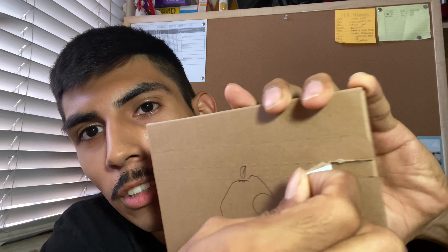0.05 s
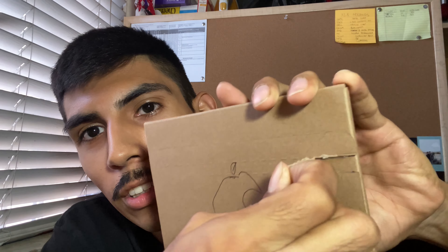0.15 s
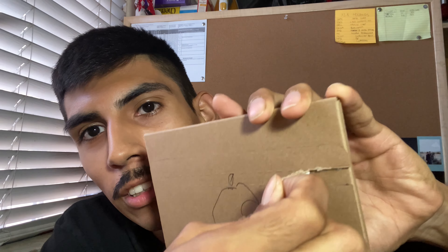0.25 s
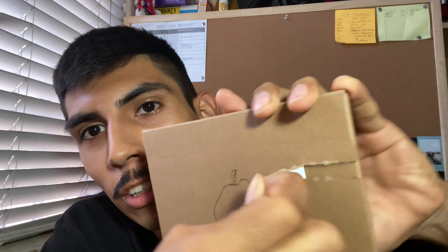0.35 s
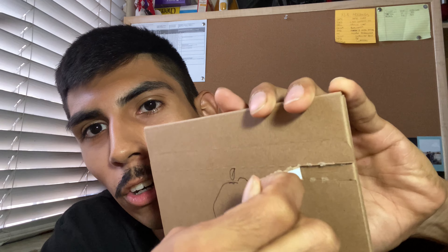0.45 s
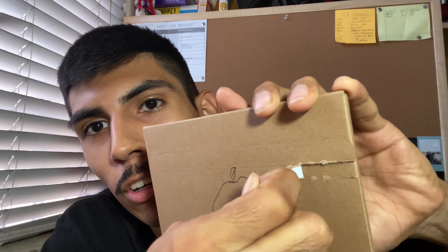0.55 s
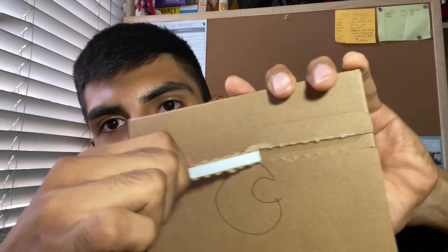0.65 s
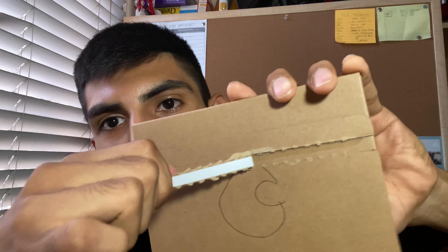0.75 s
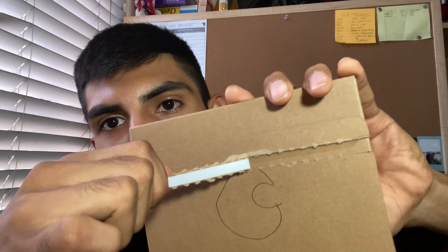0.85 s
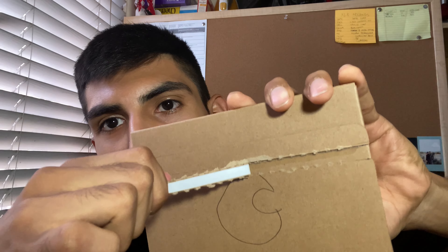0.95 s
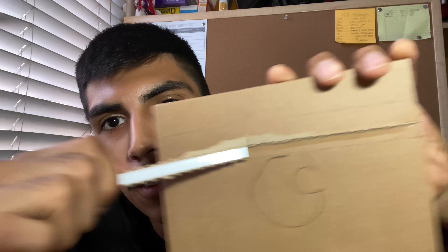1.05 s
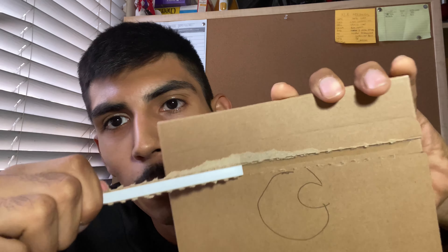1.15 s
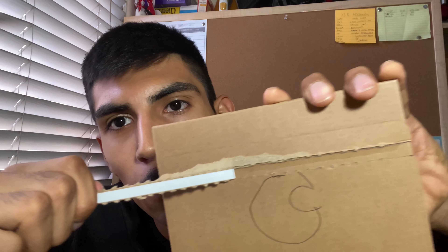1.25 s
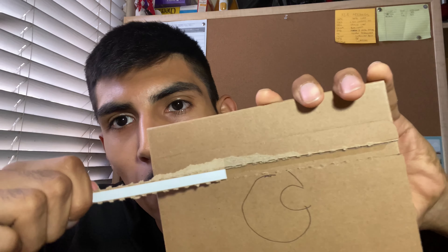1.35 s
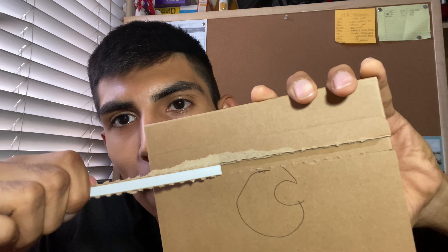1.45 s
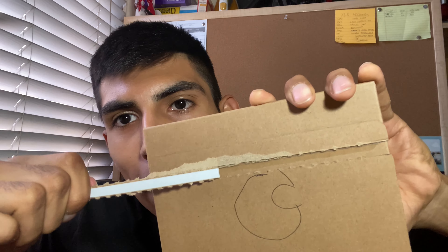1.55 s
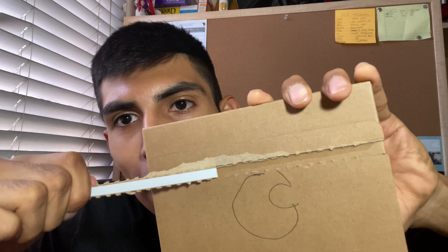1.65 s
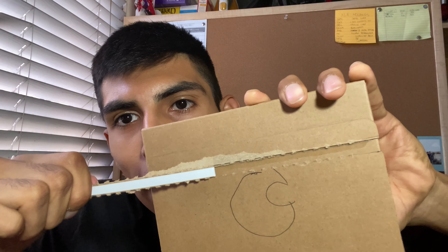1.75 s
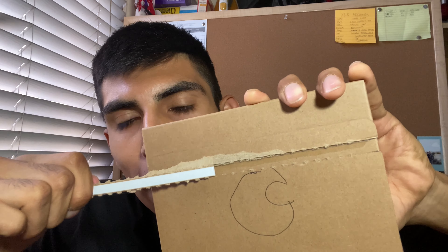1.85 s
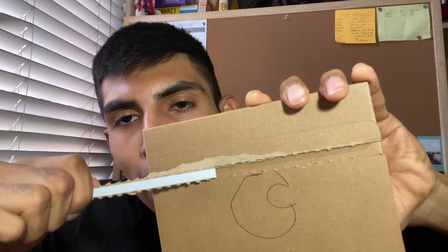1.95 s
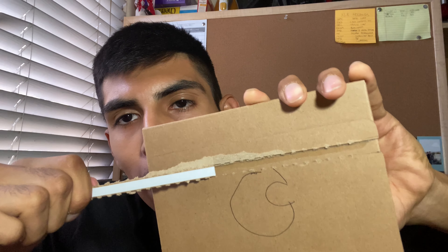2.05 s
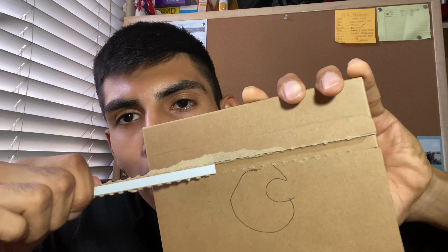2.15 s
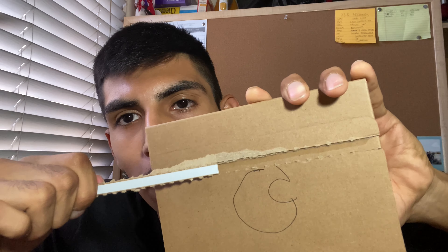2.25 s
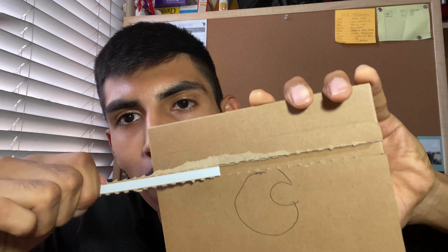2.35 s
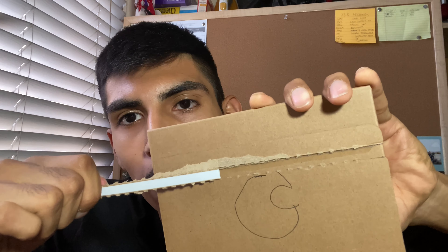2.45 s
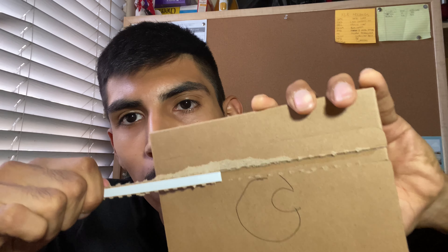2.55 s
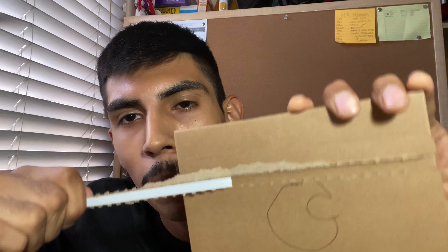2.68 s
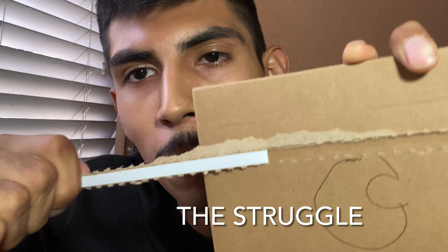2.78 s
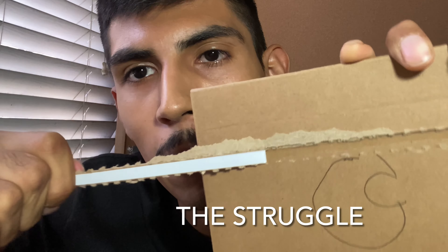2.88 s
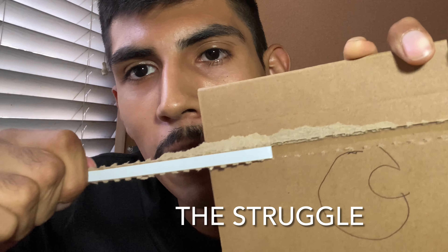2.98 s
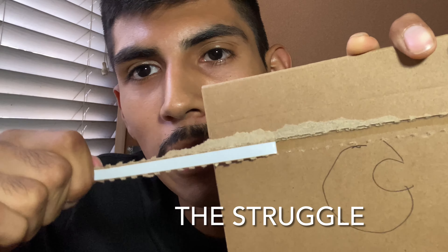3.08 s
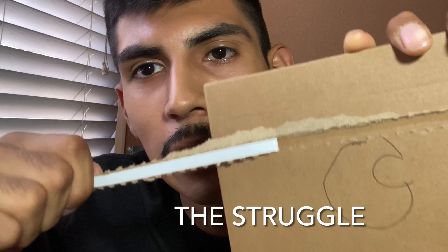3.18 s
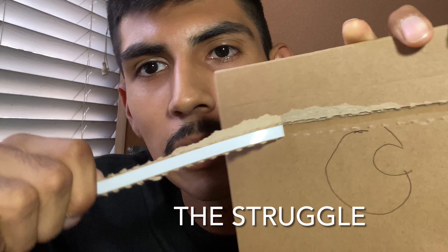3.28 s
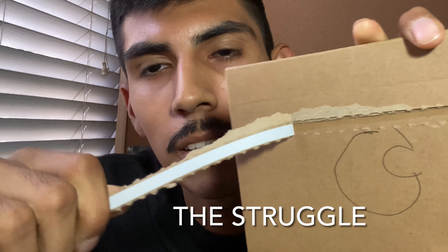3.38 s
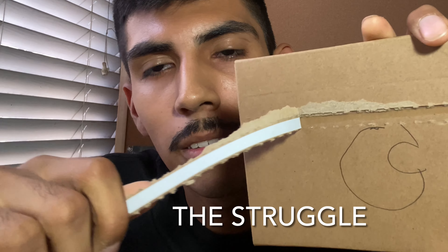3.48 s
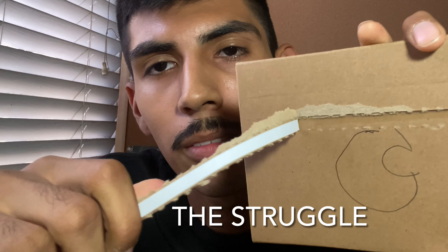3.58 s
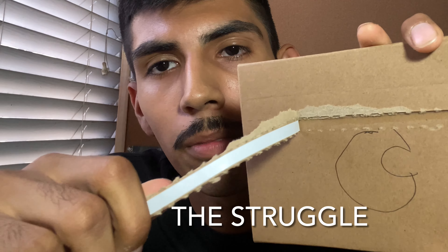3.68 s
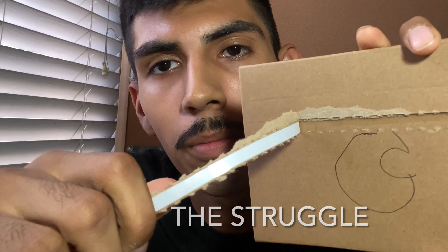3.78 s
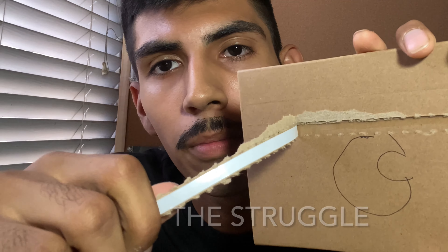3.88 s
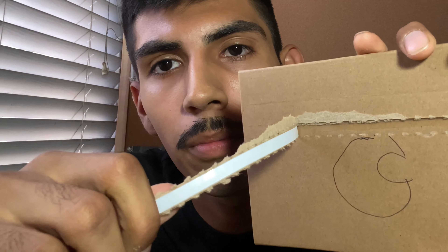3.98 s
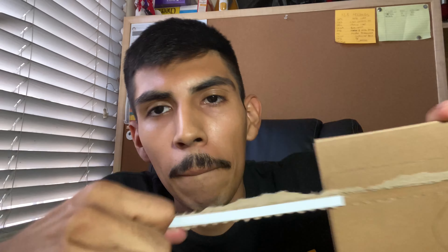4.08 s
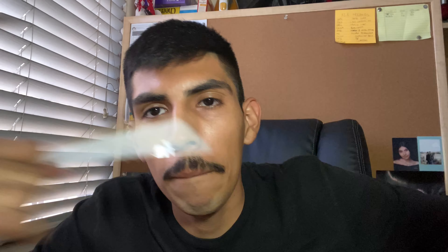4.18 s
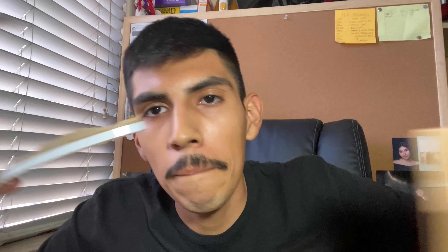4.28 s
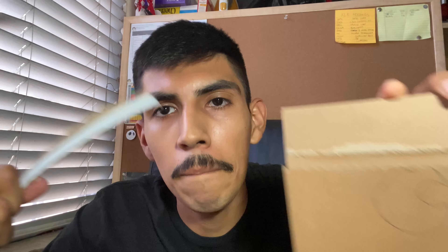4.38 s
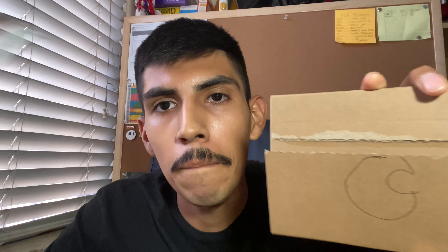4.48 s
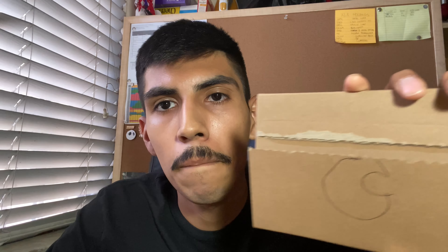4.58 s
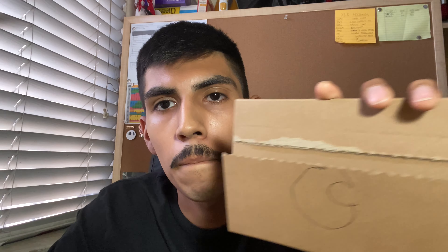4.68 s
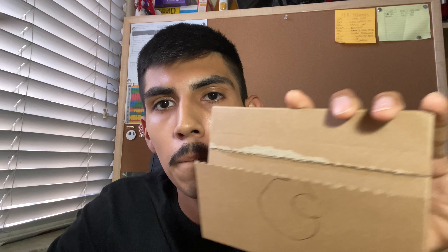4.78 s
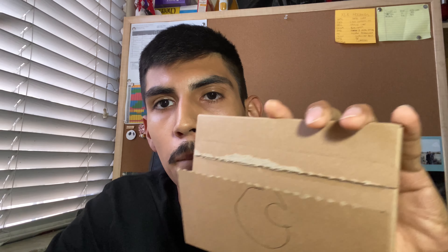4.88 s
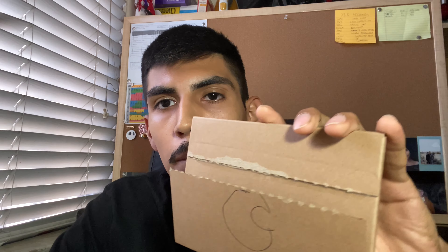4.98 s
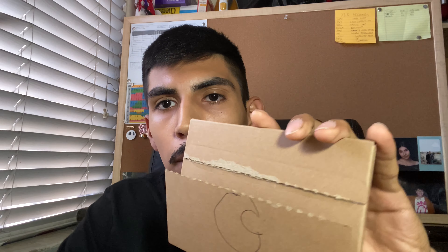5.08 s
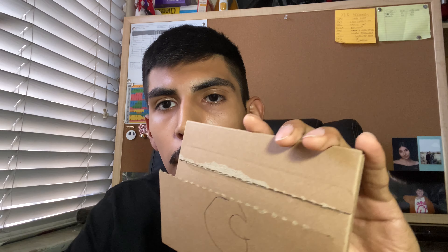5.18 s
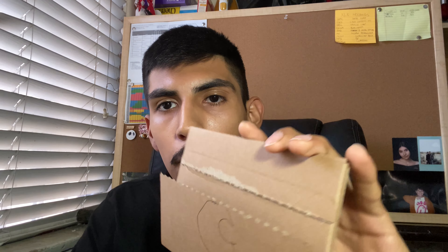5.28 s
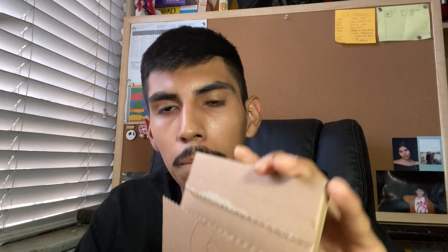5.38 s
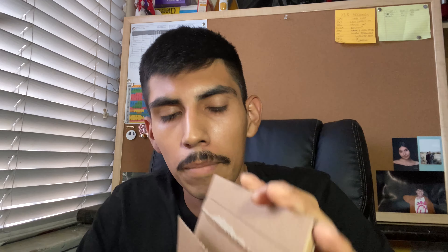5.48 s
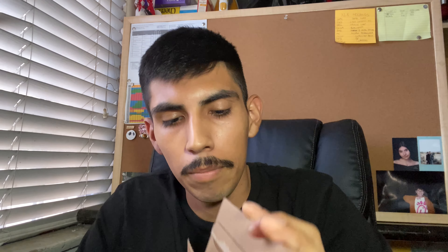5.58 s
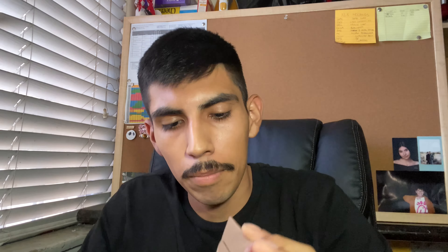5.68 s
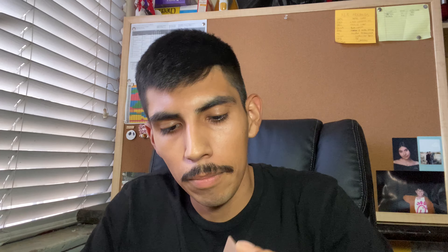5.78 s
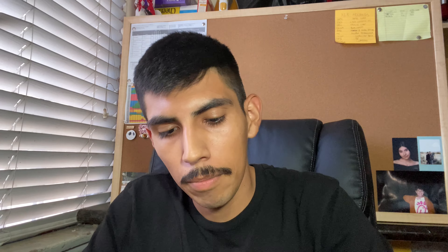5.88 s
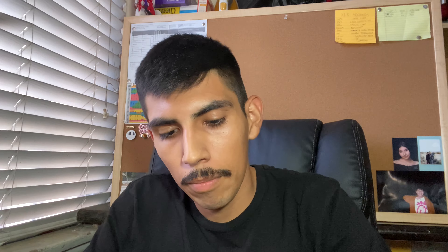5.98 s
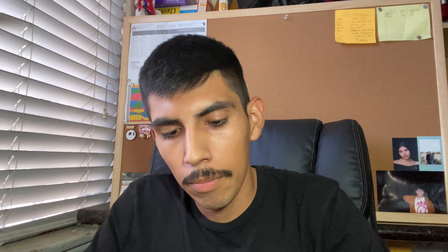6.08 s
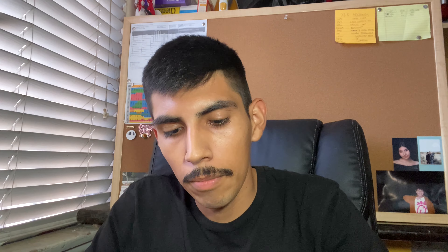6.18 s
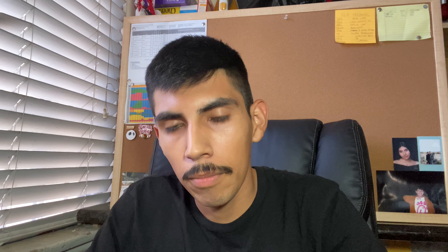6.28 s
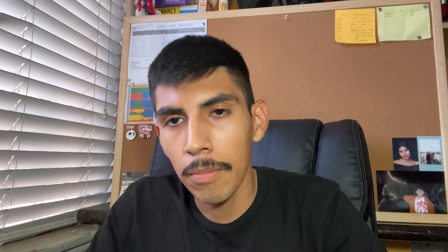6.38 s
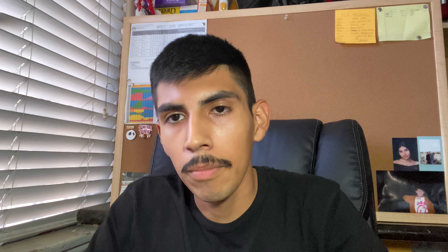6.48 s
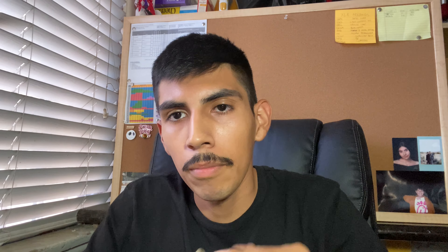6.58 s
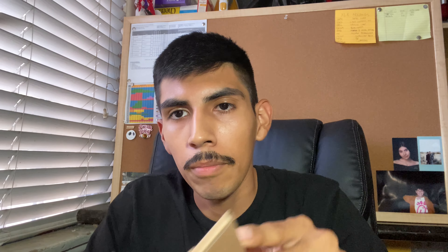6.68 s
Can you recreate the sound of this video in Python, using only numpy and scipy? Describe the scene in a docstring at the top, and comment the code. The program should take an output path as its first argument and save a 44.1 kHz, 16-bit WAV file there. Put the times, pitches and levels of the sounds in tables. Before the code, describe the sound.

Very close to a stereo microphone in a small furnished room, a cardboard strip tears in short jerks: crisp fibre crackle, sharp snaps and hollow board thumps, strongest around one second. Fine ticks trail off into quiet, then a violent snap at about 2.6 seconds, another rip just after four, and finally light taps and rubs of the flap. A low, faint fan hum lies beneath.

```python
"""A tear strip is pulled out of a cardboard mailer in jerks, close to a two-port microphone in a small furnished room.
Parting fibres are clumped random clicks, snapping bridges are short noise bursts, and both ring the board's modes.
The mailer flexes as a damped swing of sinking pitch; squeaks and finger scuffs are roughened gliding tones, and
hard hits send swooping bending waves across the board. Later, hands tap and rub the flap. Decaying noise makes
the echoes of the small room, where resonated noise makes a fan hum over shaped rumble and hiss."""
import sys
import numpy as np
from scipy import signal
from scipy.fft import rfft, irfft, next_fast_len
from scipy.io import wavfile
from scipy.ndimage import uniform_filter1d

SR = 44100
rng = np.random.default_rng(int(sys.argv[2]) if len(sys.argv) > 2 else 0)


def transcribe(signal):
    """Save signal, clipped to [-1, 1], as a 16-bit WAV file at the path in sys.argv[1]."""
    frames = np.atleast_2d(signal).T
    limited = np.clip(frames, -1, 1)
    pcm = np.round(limited * 32767).astype(np.int16)
    wavfile.write(sys.argv[1], SR, pcm)


def amplitude_ratio(level_db):
    """Convert a level in decibels to the matching linear amplitude (field) ratio."""
    exponent = np.asarray(level_db, float) / 20
    return 10 ** exponent


N = 297234   # samples
HZ = np.fft.rfftfreq(N, 1 / SR) + 1e-3   # the offset keeps log(HZ) finite


def rms_one(x):
    """Normalisation: scale to unit rms."""
    return x / np.sqrt(np.mean(x ** 2) + 1e-20)


def at_hz(points, column=1):
    """Spectral envelope: a table interpolated over log frequency onto the FFT grid."""
    points = np.array(points)
    return np.interp(np.log(HZ), np.log(points[:, 0]), points[:, column])


def colour(x, response):
    """Linear filtering: the spectrum is multiplied by a frequency response."""
    return irfft(rfft(x) * response, N)


def resonate(x, hz, width_hz):
    """Damped resonance: a two-pole filter with gain 1 on top."""
    r = np.exp(-np.pi * width_hz / SR)
    zeros = [(1 - r * r) / 2, 0, (r * r - 1) / 2]
    poles = [1, -2 * r * np.cos(2 * np.pi * hz / SR), r * r]
    return signal.lfilter(zeros, poles, x + 1e-18)


def drift(rate_hz):
    """Slow random fluctuation: low-passed noise of unit rms."""
    r = np.exp(-2 * np.pi * rate_hz / SR)
    return rms_one(signal.lfilter([1], [1, -2 * r, r * r], rng.standard_normal(N)))


def grains(per_s, spread_db, clump_db, clump_hz):
    """Stick-slip impulse noise: random clicks of uneven size that come in clumps; rms 1."""
    sizes = amplitude_ratio(spread_db * np.minimum(rng.exponential(1, N), 4)) * rng.choice([-1, 1], N)
    struck = rng.random(N) < per_s / SR
    return rms_one(sizes * struck * amplitude_ratio(clump_db * drift(clump_hz)))


def rip_ring_hz(s):
    """Modal shift: the board's brightest ring rises as the tear nears the edge."""
    start_hz, rise_octaves_per_s = 1250., 0.17
    return start_hz * 2 ** (rise_octaves_per_s * s)


# full rips of the strip: start_s, end_s, crackle_db, board_db, change_db (over the rip)
RIP_TABLE = [(0, 0.006, -30.5, -25.5, -12), (0.339, 0.377, -31, -33, 7.5),
             (0.624, .692, -36.5, -37.5, -8.5), (0.672, 0.719, -30.5, -33, 3.5),
             (1.006, 1.049, -23.5, -23, 9), (1.063, 1.1, -23.5, -22, -5.5),
             (2.621, 2.643, -21.5, -24.5, 7.5), (4.053, 4.089, -46, -36, -2.5),
             (4.125, 4.155, -31.5, -29.5, -6.5)]
# the strip strains or peels under a light pull: start_s, end_s, crackle_db, change_db
STRAIN_TABLE = [(0.216, 0.341, -68, 28.5), (0.514, 0.593, -61.5, 13.5), (0.945, 1.008, -51, 9),
                (1.149, 1.231, -56, -6.5), (1.24, 1.343, -53.5, -5), (1.324, 1.615, -79, -9.5),
                (2.578, 2.631, -56, 11.5), (4.092, 4.131, -45, 6), (2.987, 3.078, -77.5, -8.5),
                (4.834, 4.876, -76, 4.5)]
# hands and strip rub the board: start_s, end_s, board_db, change_db, bright_hz (brightest ring)
RUB_TABLE = [(0.017, 0.061, -55, 5.5, 1560), (0.771, 0.812, -50.5, -6.5, 1000), (0.825, .87, -54, 2, 1100),
             (.87, .945, -55, 0.5, 1300), (2.693, 2.763, -50.5, -25, 1925), (3.246, 3.337, -73, -3.5, 1760),
             (3.48, 3.54, -65, -10, 3000), (4.166, 4.307, -53.5, -11.5, 2200),
             (4.288, 4.358, -56.5, -13, 1500), (4.955, 4.98, -41, -14.5, 781),
             (4.982, 5.04, -62, -14.5, 2280), (5.27, 5.307, -42, -14, 884), (5.287, 5.345, -57, -7.5, 3770),
             (5.355, 5.452, -61, -13.5, 1190), (5.886, 5.996, -69, 8, 1565),
             (6.489, 6.559, -51, 15.5, 1710), (6.563, 6.64, -58, -22, 1924)]


def stretches(release_s=0.014):
    """Stick-slip friction: each rip, strain or rub starts at once, drifts in level and stops as the motion sticks."""
    strain_board_db, strain_ring_hz = -4.5, 2140   # board relative to the crackle
    rub_crackle_db = -12.5   # crackle relative to the board
    crackle, shake, bright_hz = np.zeros(N), np.zeros(N), np.full(N, 1500.)
    t = np.arange(N) / SR
    rows = [(*rip, rip_ring_hz(rip[0])) for rip in RIP_TABLE]
    rows += [(start, end, db, db + strain_board_db, change, strain_ring_hz)
             for start, end, db, change in STRAIN_TABLE]
    rows += [(start, end, db + rub_crackle_db, db, change, hz) for start, end, db, change, hz in RUB_TABLE]
    for start, end, crackle_db, board_db, change_db, hz in sorted(rows):
        near = slice(max(round(start * SR), 0), round((end + .05) * SR))
        age = t[near] - start
        shape = amplitude_ratio(change_db * (np.minimum(age / (end - start), 1) - .5))
        shape *= np.clip(age / .002, 0, 1) * np.exp(-np.maximum(t[near] - end, 0) / release_s)
        crackle[near] += amplitude_ratio(crackle_db) * shape
        shake[near] += amplitude_ratio(board_db) * shape
        bright_hz[near] = hz
    return crackle, shake, bright_hz


# bridges of the perforation snap: start_s, level_db
SNAP_TABLE = [(0.249, -44.5), (0.294, -48.5), (0.3043, -31.5), (0.313, -41), (0.327, -30), (0.3502, -20.5),
              (0.3536, -18.5), (0.381, -24), (0.525, -47), (0.543, -61), (0.555, -44), (0.627, -18.5),
              (.677, -15.5), (0.712, -22.5), (0.869, -43.5), (0.946, -31), (1.025, -27), (1.042, -11),
              (1.097, -18), (1.19, -35), (1.1993, -33), (1.209, -31), (1.2425, -35), (1.3297, -40.5),
              (1.399, -40.5), (1.4478, -52.5), (1.481, -51), (1.507, -49.5), (1.561, -55), (1.5915, -57),
              (2.541, -50), (2.5866, -36), (2.5967, -49), (2.6181, -19), (2.6293, -12), (2.6478, -4.5),
              (4.554, -51.5), (5.737, -63.5), (5.889, -48)]
# hits from fingers or the whipping strip that mostly ring the board: start_s, ring_db, edge_db, bright_hz
TAP_TABLE = [(0.3645, -16.5, -18, 894), (0.4572, -37, -46.5, 930), (.657, -21, -40, 1109),
             (.717, -20, -38.5, 1186), (.7776, -25.5, -60, 1200), (.8022, -35, -65, 893),
             (1.0082, -10.5, -17.5, 1206), (1.0375, -12.5, -18, 1283), (1.0547, -3, -17, 1250),
             (1.0714, -7.5, -12.5, 1305), (2.7192, -32.5, -49.5, 1770), (3.2693, -56.5, -56, 3500),
             (3.302, -47.5, -55.5, 1500), (3.485, -34, -34, 3900), (4.076, -30.5, -50.5, 1600),
             (4.13, -11.5, -29.5, 1350), (4.1453, -5, -8.5, 2600), (4.2851, -26.5, -45, 1850),
             (4.9507, -26.5, -61, 905), (5.1247, -51, -54, 2960), (5.265, -20, -37.5, 3880),
             (5.3512, -28.5, -73, 1284), (6.4889, -39.5, -58, 1725)]


def hits():
    """Impulsive excitation: snaps and taps as columns start_s, edge_db, ring_db, bright_hz."""
    ring_growth = 1.5   # the board's ring falls faster than the snap weakens
    snaps = [(s, db, ring_growth * db, rip_ring_hz(s)) for s, db in SNAP_TABLE]
    taps = [(s, edge_db, ring_db, hz) for s, ring_db, edge_db, hz in TAP_TABLE]
    return np.transpose(snaps + taps)


def bursts(level_db, fade_s):
    """Impact transient: a short decaying noise burst at every snap and tap."""
    age = np.arange(600)   # samples
    shape = rng.standard_normal((len(level_db), 600)) * np.exp(-age / (fade_s * SR))
    shape[:, 0] = 4.0   # the first contact is the hardest
    # each burst gets the energy of a plain decay from 1
    shape *= np.sqrt(fade_s * SR / 2) / np.linalg.norm(shape, axis=1, keepdims=True)
    out = np.zeros(N + 600)
    for s, gain, row in zip(hits()[0], amplitude_ratio(level_db), shape):
        out[round(s * SR) + age] += gain * row
    return out[:N]


# colour of parting fibres: pitch_hz, relative_db (density per Hz)
FIBRE_COLOUR = [(2000, -19), (4000, -13), (6500, -11), (8500, -3.5), (10400, -0.5), (13000, -9.5),
                (14000, -15.5), (14500, -32), (16500, -48)]


def fibres(crackle, shake, full_tear_db=-48):
    """Fracture noise: lone ticks under a light pull, dense spray at full tear, sharp cracks where a bridge snaps."""
    tone = amplitude_ratio(at_hz(FIBRE_COLOUR))
    tone /= np.sqrt(np.mean(tone ** 2))
    light = 1 / (1 + (crackle / amplitude_ratio(full_tear_db)) ** 2)
    ticking = light * crackle ** 2 / (crackle ** 2 + shake ** 2 + 1e-18)   # mere rubbing stays smooth
    dense = grains(6000, spread_db=3.5, clump_db=3.5, clump_hz=80)
    sparse = grains(150, spread_db=4.0, clump_db=2.0, clump_hz=20) * .7 + dense * .5
    parting = np.sqrt(1 - ticking) * dense + np.sqrt(ticking) * sparse
    cracks = bursts(hits()[1], fade_s=0.00054)
    return colour(crackle * parting + cracks, tone)


# modes of the board: pitch_hz, width_hz, level_db (relative)
BOARD_MODES = [(400, 170, 7.5), (550, 250, 0.5), (685, 200, -4), (851, 78, -1.5), (1000, 110, -4),
               (1200, 120, -1), (1500, 300, 1.5), (2020, 560, 4), (2550, 450, 6.5), (3285, 260, 3.5),
               (4070, 620, 1), (4680, 370, -1.5), (5770, 1800, 0)]


def board(shake, bright_hz, reach=.6):
    """Modal excitation: tearing rings the modes, most those near the brightest, and rumbles below them."""
    _, _, ring_db, ring_hz = hits()
    rub, knock, power = 0, 0, 1e-9
    hard = shake ** 2 / (shake ** 2 + amplitude_ratio(-36) ** 2)   # a hard rip is coarse and shakes every mode, a rub is smooth
    coarse = grains(1200, spread_db=3.2, clump_db=3.0, clump_hz=70)
    smooth = rng.standard_normal(N) * amplitude_ratio(2 * drift(30))
    jolts = np.sqrt(hard) * coarse + np.sqrt(1 - hard) * smooth
    for k, (hz, width_hz, level_db) in enumerate(BOARD_MODES):
        sign = (-1) ** k
        nearness = np.exp(-(np.log(hz / bright_hz) / reach) ** 2)
        weight = amplitude_ratio(level_db) * (.12 + .3 * hard + nearness)
        rub = rub + sign * weight * rms_one(resonate(jolts, hz, width_hz))
        power = power + weight ** 2
        near_db = -15 * np.minimum(np.log(hz / ring_hz) ** 2, 1.4)
        blow = bursts(ring_db + near_db, fade_s=0.0018)
        ring = resonate(resonate(blow, hz, width_hz), hz, 3 * width_hz)
        knock = knock + sign * ring * np.sqrt(900 / width_hz)
    low = 2 * resonate(jolts, 160, 90) + resonate(jolts, 520, 280)
    rumble = amplitude_ratio(-10) * hard * rms_one(low)
    return shake * (rub / np.sqrt(power) + rumble) + knock


# jerks that set the whole mailer swinging: start_s, level_db
FLEX_TABLE = [(0, -21.5), (0.369, -22), (0.631, -26.5), (.687, -28.5), (1.012, -27.5), (1.031, -24.5),
              (1.053, -18.5), (1.085, -19.5), (2.633, -25.5), (2.65, -20.5), (4.066, -26.5), (4.143, -29.5)]


def flexing():
    """Damped oscillation: a jerked mailer swings fast at first, then sinks to its rest pitch and dies."""
    first_hz, rest_hz, sink_s = 92., 63.5, 0.0083
    free_t60_s, free_s, grip_t60_s = 0.14, 0.079, .06   # after free_s the gripping hand adds its damping
    out, age = np.zeros(N + SR), np.arange(SR // 4) / SR
    turns = rest_hz * age + (first_hz - rest_hz) * sink_s * (1 - np.exp(-age / sink_s))
    loss_db = 60 * age / free_t60_s + 60 * np.maximum(age - free_s, 0) / grip_t60_s
    swing = np.minimum(age / 0.0039, 1) * np.sin(2 * np.pi * turns)
    for s, level_db in FLEX_TABLE:
        out[round(s * SR):round(s * SR) + len(age)] += amplitude_ratio(level_db - loss_db) * swing
    return out[:N]


# likeness of diffuse sound at the ports: pitch_hz, common_share (of power, no unit)
COMMON_SHARE = [(60, .9), (200, .6), (700, .1), (6000, .1), (7900, .9), (9300, .5), (10300, .99),
                (11700, .5), (13000, .7)]


def shared(common, own):
    """Partial coherence of a diffuse field: a part common to both ports and a part of each."""
    alike = at_hz(COMMON_SHARE)
    return colour(common, np.sqrt(alike)) + colour(own, np.sqrt(1 - alike))


# echo bands: pitch_hz, t60_s, late_db (echo), scatter_db (off hands and desk), levels before band filtering
ECHO_BANDS = [(60, .2, -18, -14), (500, .26, -11, 0), (1800, .21, -10, 1), (4500, .24, -10, 4),
              (11000, .17, -13, -1)]


def room(x):
    """Reverberant decay: scatter and late echoes are noise dying band by band, one pattern for each mailer pose."""
    poses, pose_s, scatter_t60_s = 3, .06, .015   # the mailer keeps moving, so its echoes change
    t, tail = np.arange(SR // 3) / SR, 0
    white = rng.standard_normal((poses, 3, SR // 3))   # a common pattern and one for each port
    edges = [30] + [np.sqrt(a[0] * b[0]) for a, b in zip(ECHO_BANDS, ECHO_BANDS[1:])] + [17000]
    early = amplitude_ratio(-60 * t / scatter_t60_s)
    for (_, t60, late_db, early_db), low, high in zip(ECHO_BANDS, edges, edges[1:]):
        late = amplitude_ratio(-60 * t / t60) * np.minimum(t / .004, 1)
        fade = amplitude_ratio(late_db) * late / np.linalg.norm(late) + amplitude_ratio(early_db) * early / np.linalg.norm(early)
        band = signal.butter(2, [low, high], "band", fs=SR, output="sos")
        tail = tail + fade * signal.sosfilt(band, white)
    pose = (np.arange(N) / (pose_s * SR)).astype(int) % poses
    held = [uniform_filter1d(1. * (pose == k), size=441) * x for k in range(poses)]
    size = next_fast_len(N + SR // 3)
    spectrum = (rfft(held, size)[:, None] * rfft(tail, size)).sum(axis=0)
    echoes = irfft(spectrum, size)[:, :N]
    return shared(echoes[0], echoes[1:])


# colour of room rumble and hiss: pitch_hz, relative_db (density per Hz)
AIR_COLOUR = [(20, -42.5), (35, -12.5), (55, -1.5), (113, -15.5), (220, -19.5), (380, -32.5), (700, -35.5),
              (1270, -38.5), (2400, -41.5), (5000, -46), (8300, -44.5), (13000, -47), (14300, -54),
              (15500, -82.5)]


def rumble_and_hiss():
    """Broadband background noise: white noise shaped by a spectral envelope."""
    return amplitude_ratio(-64.5) * rms_one(colour(rng.standard_normal(N), amplitude_ratio(at_hz(AIR_COLOUR))))


# hum lines of the fan: pitch_hz, width_hz, level_db
FAN_LINES = [(50.6, 31.1, -56), (108.3, 6.3, -61), (125, 2.8, -75.5), (157, 1.7, -69), (212.84, 4.1, -69.5),
             (287, 45, -76), (2380, 10, -95.5)]


def fan():
    """Narrow-band noise: each line of the hum is noise through two resonances in series."""
    out = 0
    for hz, width_hz, level_db in FAN_LINES:
        line = resonate(resonate(rng.standard_normal(N), hz, width_hz), hz, 3 * width_hz)
        out = out + amplitude_ratio(level_db) * rms_one(line)
    return out


def air():
    """Superposition of a diffuse background: rumble, hiss and fan, partly common to the ports."""
    common, left, right = [rumble_and_hiss() + fan() for _ in range(3)]
    return shared(common, np.array([left, right]))


def glides(rows):
    """Narrow-band modulation: gliding tones, roughened over their width, that swell and fade."""
    swell_skew = 0.91   # under 1 the swell peaks early
    out = np.zeros(N)
    for start, end, first_hz, last_hz, width_hz, level_db in rows:
        part = np.linspace(0, 1, round((end - start) * SR))
        r = np.exp(-np.pi * width_hz / SR)
        noise = [1, 1j] @ rng.standard_normal((2, 9000))
        wobble = signal.lfilter([1], [1, -2 * r, r * r], noise)[-len(part):]
        wobble /= np.abs(wobble) ** 0.62   # the level wavers less than the pitch
        turns = np.cumsum(first_hz + (last_hz - first_hz) * part) / SR
        tone = (wobble * np.exp(2j * np.pi * turns)).real
        swell = np.sin(np.pi * part ** swell_skew) ** 2
        out[round(start * SR):round(start * SR) + len(part)] += amplitude_ratio(level_db) * rms_one(tone) * swell
    return out


# thin squeaks and hums of tape and taut strip: start_s, end_s, first_hz, last_hz, level_db (before the swell)
SQUEAK_TABLE = [(0.104, 0.24, 1366, 1530, -62), (0.454, 0.492, 980, 1000, -35.5),
                (0.483, 0.551, 1000, 926, -55), (.86, 0.972, 144, 128, -44.5),
                (3.355, 3.408, 4730, 4680, -76.5), (3.395, 3.478, 4670, 4270, -65),
                (3.539, 3.608, 900, 835, -71)]


def squeaks():
    """Friction-driven vibration: tape and taut strip sound narrow gliding tones."""
    width = 0.063   # share of the pitch, which counts up to 1200 Hz
    return glides([(start, end, hz, last_hz, width * min(hz, 1200), db)
                   for start, end, hz, last_hz, db in SQUEAK_TABLE])


# hard hits that send a bending wave across the board: start_s, level_db
BEND_TABLE = [(0.3632, -26.5), (0.482, -39), (.626, -32.5), (0.7802, -43.5), (1.0077, -18), (1.0233, -18),
              (1.038, -14), (1.0543, -12), (1.071, -16.5), (2.62, -28), (4.13, -41), (4.952, -29.5),
              (5.385, -46.5)]


def bending():
    """Dispersion: the low part of a bending wave arrives last, so it swoops down in pitch."""
    top_hz, fall_s, fade_s = 1693, .0035, .0045
    out, age = np.zeros(N + SR), np.arange(SR // 20) / SR
    turns = top_hz * fall_s * age / (age + fall_s)
    swoop = np.sin(2 * np.pi * turns) * np.exp(-age / fade_s)
    for s, level_db in BEND_TABLE:
        out[round(s * SR):round(s * SR) + len(age)] += amplitude_ratio(level_db) * swoop
    return out[:N]


# breathy scuffs of fingers on the board: start_s, end_s, first_hz, level_db (before the swell)
SCUFF_TABLE = [(0.448, 0.534, 712.6, -40), (.78, 0.889, 169.3, -43.5), (.81, 0.885, 561, -58),
               (.93, 0.998, 179, -53), (2.171, 2.212, 860, -69), (3.44, 3.479, 2300, -73.5),
               (3.45, 3.507, 1040, -66.5), (3.5, 3.561, 1000, -62.5), (3.51, 3.552, 1587, -76.5),
               (4.052, 4.096, 318, -41.5), (5.27, 5.463, 133.9, -50), (5.383, 5.41, 563, -51),
               (5.958, 6.015, 1668, -66)]


def scuffs():
    """Friction noise: fingers on the board sound broad, breathy tones that sag in pitch."""
    width, sag = .45, 0.12   # shares of the pitch, which counts up to 900 Hz for the width
    return glides([(start, end, hz, hz * (1 - sag), width * min(hz, 900), db)
                   for start, end, hz, db in SCUFF_TABLE])


def scene():
    """Superposition: the mailer, its echoes and the room's own noise add."""
    crackle, shake, bright_hz = stretches()
    mailer = fibres(crackle, shake) + board(shake, bright_hz) + flexing()
    mailer = mailer + squeaks() + bending() + scuffs()
    return mailer + room(mailer) + air()


# phase lead of the left port: pitch_hz, lead_radians
LEFT_LEAD = [(0, 0), (60, -.5), (700, -1.3), (1400, -2.0), (2400, -2.0), (6500, -1.2), (7900, 0),
             (9300, 1.6), (9900, 3.1), (10900, 3.2), (11700, 4.3), (12700, 6.0), (14000, 6.4), (15000, 9.0)]
# level of the left port over the right: pitch_hz, level_db
LEFT_LEVEL = [(60, -5), (200, -6), (700, -7), (1300, -5), (2400, -3), (4400, -2.5), (8000, 0)]


def two_ports(dry):
    """Interchannel level and phase differences: the ports differ by frequency; deep bass is cut."""
    leads = np.interp(HZ, *np.transpose(LEFT_LEAD))
    half = amplitude_ratio(at_hz(LEFT_LEVEL) / 2) * np.exp(.5j * leads)   # each port takes half the difference
    ports = colour(dry, np.array([half, 1 / half]))
    low_cut = signal.butter(2, 38, "high", fs=SR, output="sos")   # Hz
    return signal.sosfilt(low_cut, ports)


def top_cut(x):
    """Nothing passes above the cut-off."""
    return signal.sosfilt(signal.butter(12, 15710, fs=SR, output="sos"), x)


def record(dry):
    """Two-port pickup: the close microphone turns the scene into the finished stereo mix."""
    mix = two_ports(dry)
    return top_cut(mix)


dry = scene()
out = record(dry)
transcribe(out)
```